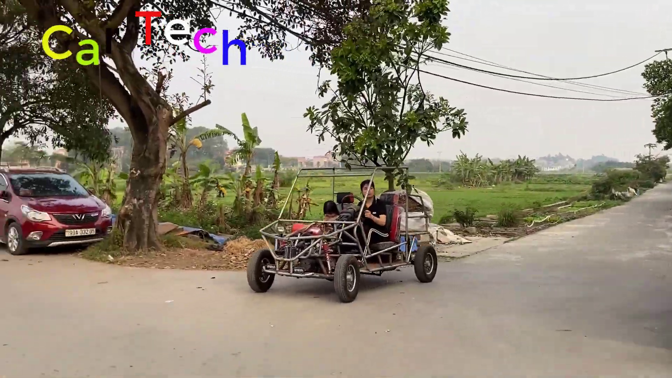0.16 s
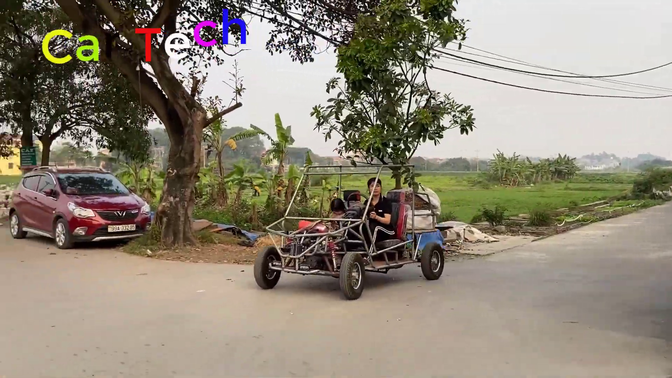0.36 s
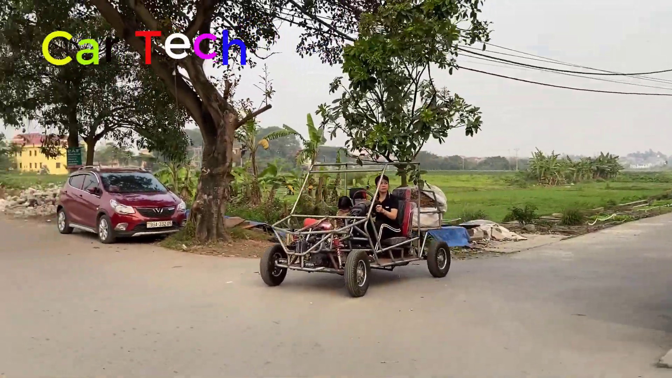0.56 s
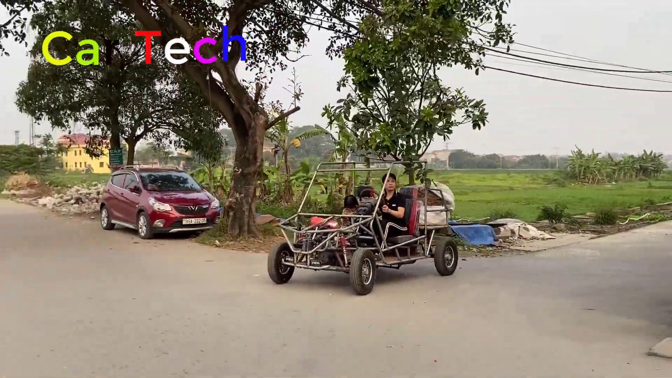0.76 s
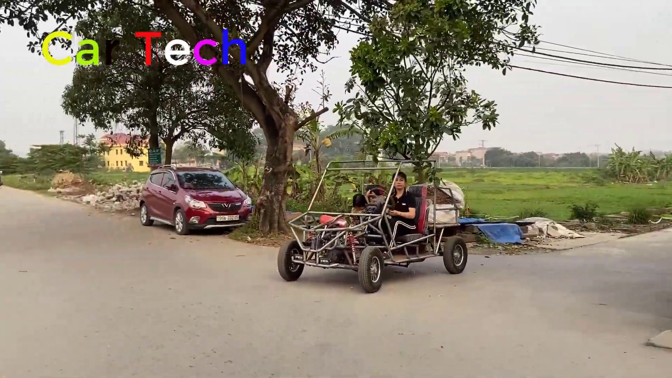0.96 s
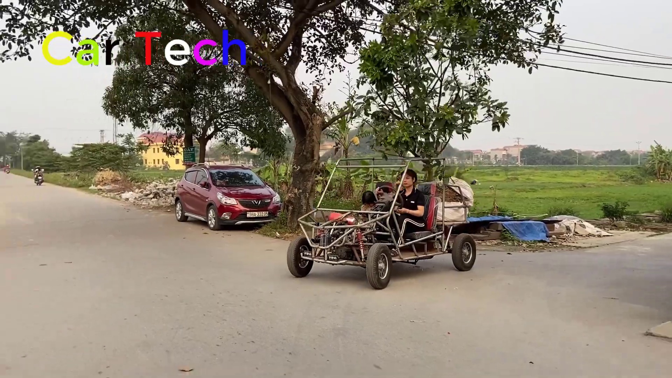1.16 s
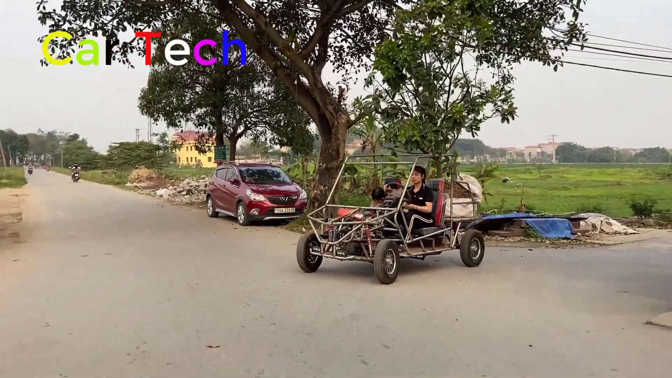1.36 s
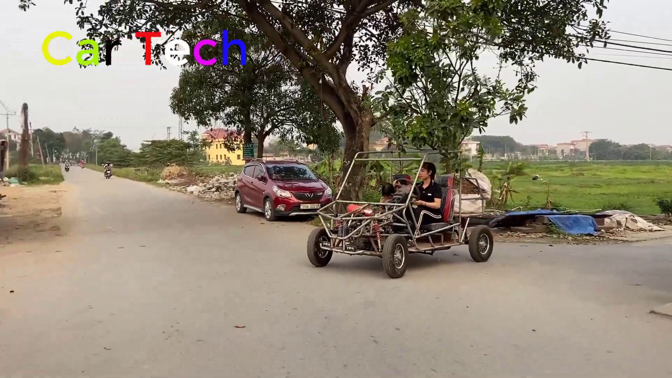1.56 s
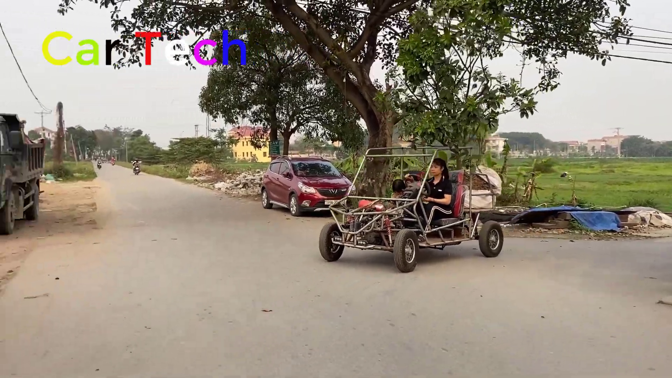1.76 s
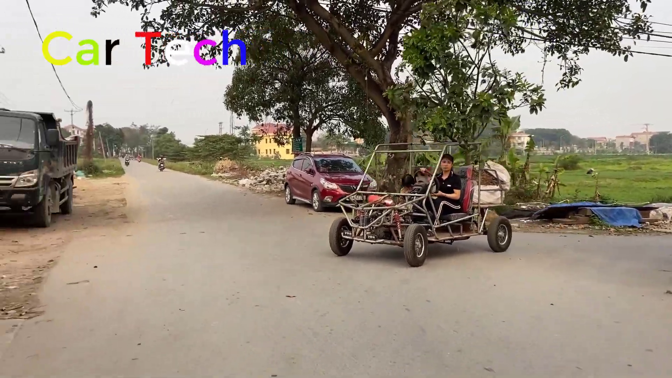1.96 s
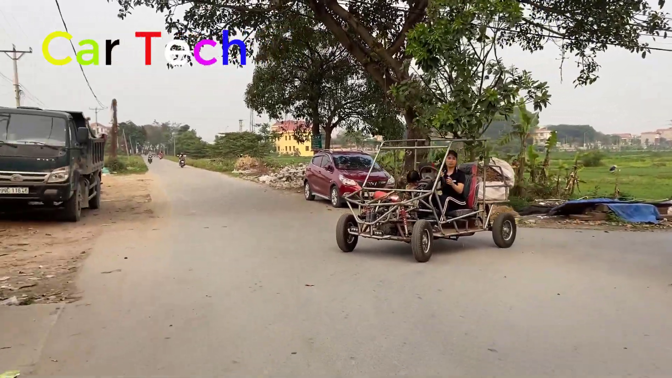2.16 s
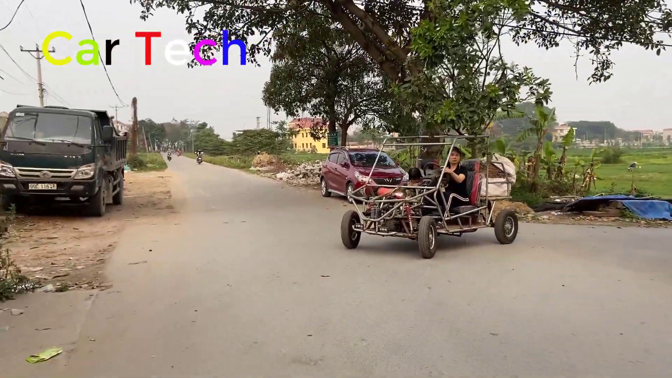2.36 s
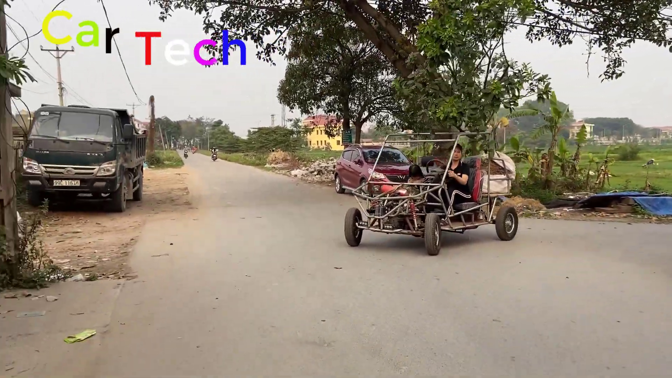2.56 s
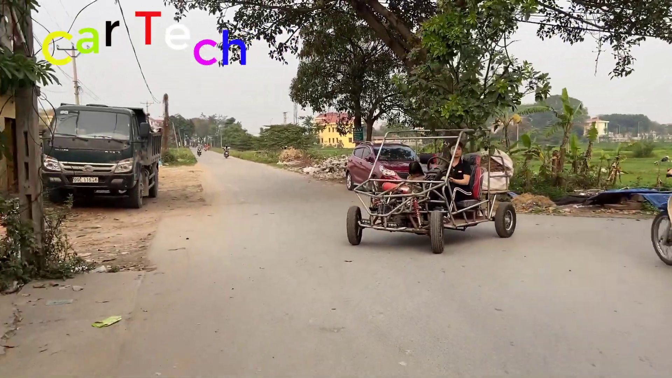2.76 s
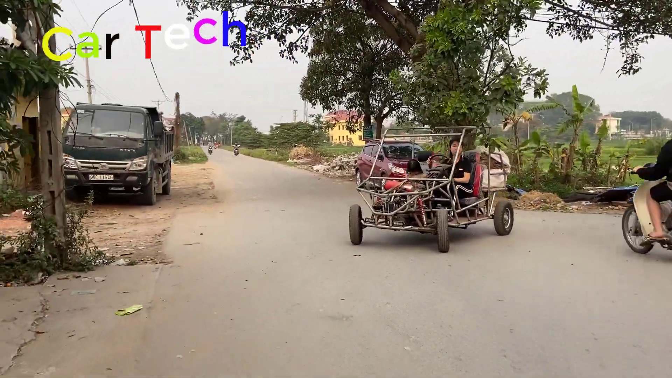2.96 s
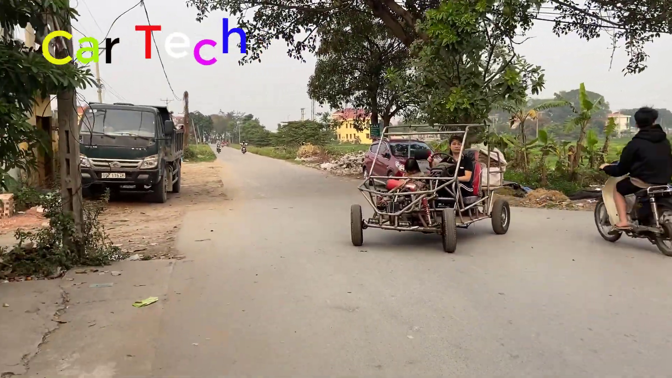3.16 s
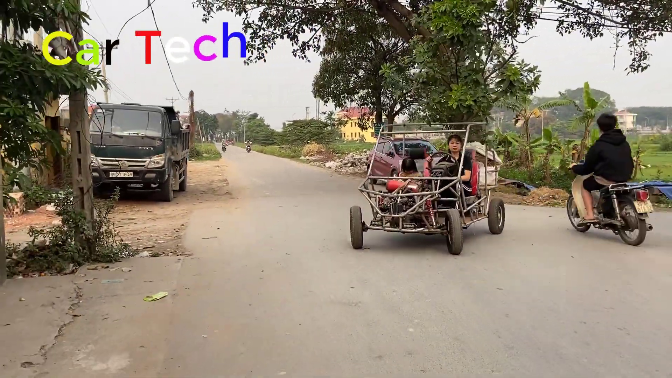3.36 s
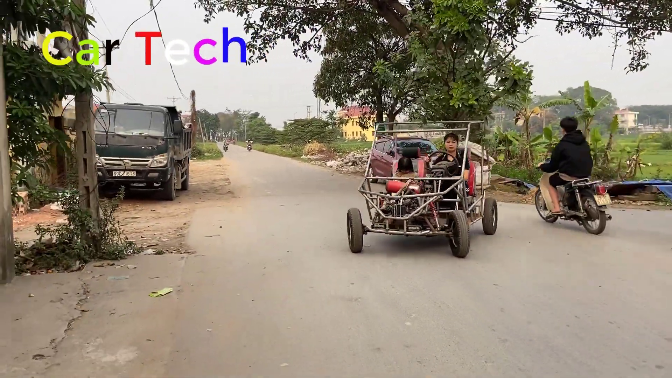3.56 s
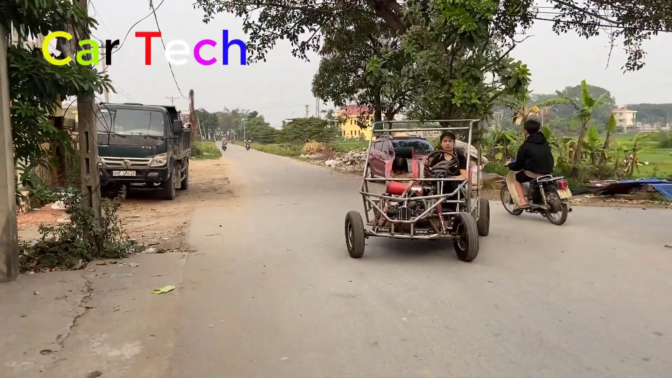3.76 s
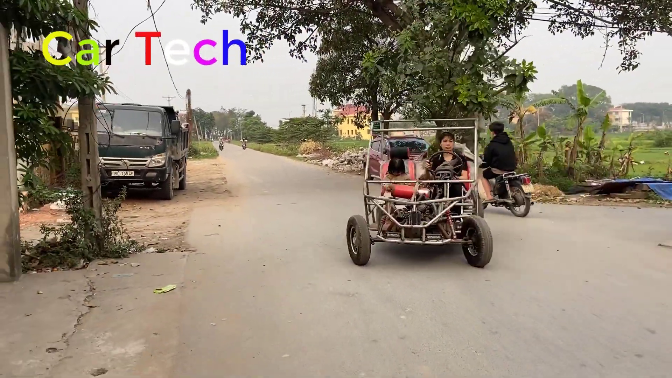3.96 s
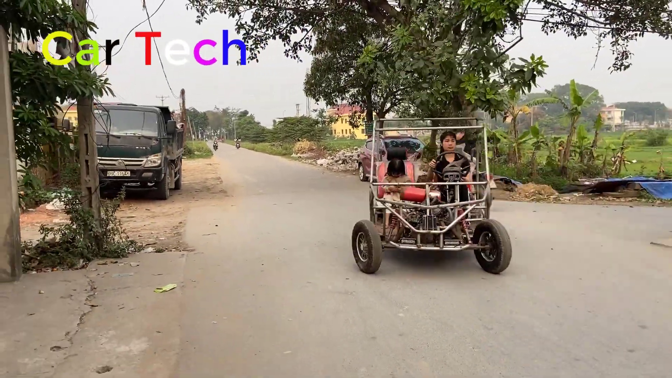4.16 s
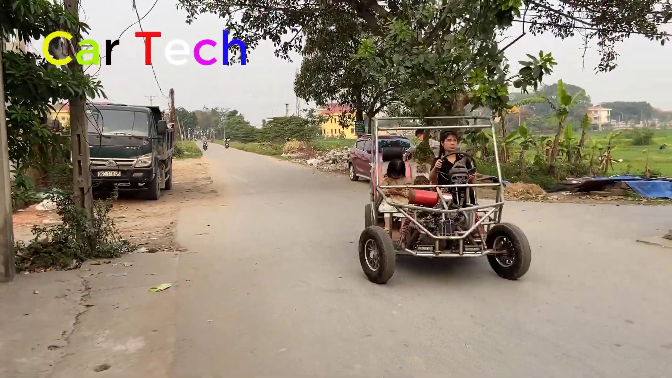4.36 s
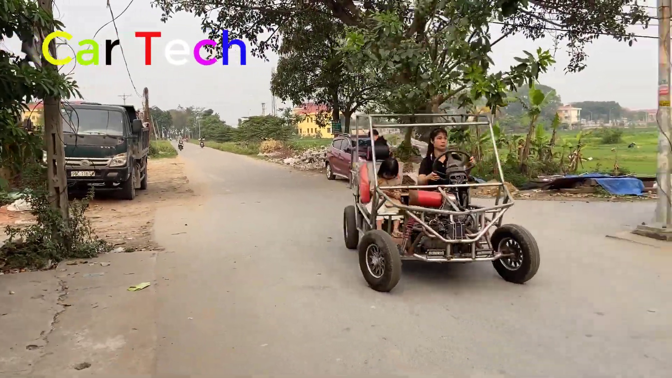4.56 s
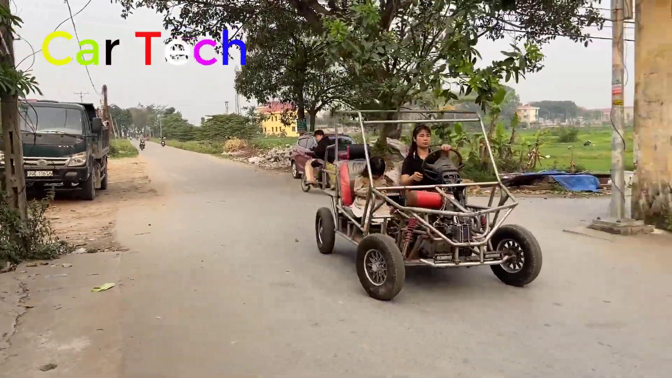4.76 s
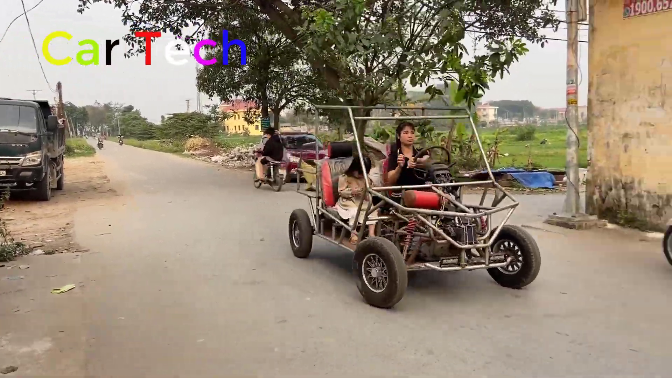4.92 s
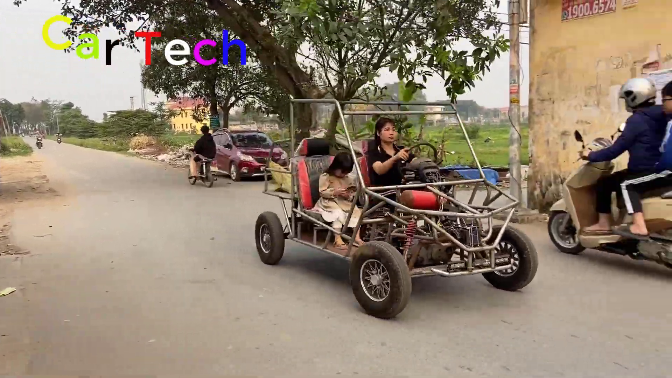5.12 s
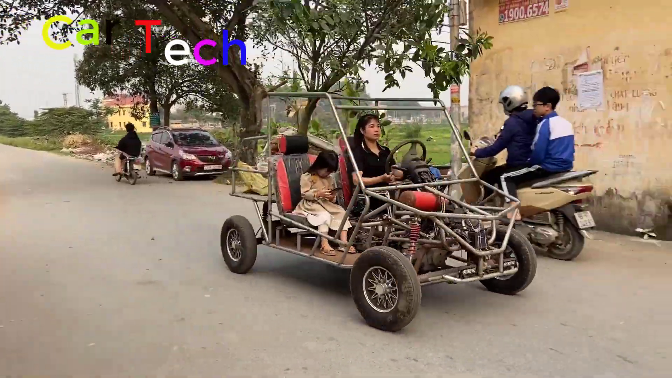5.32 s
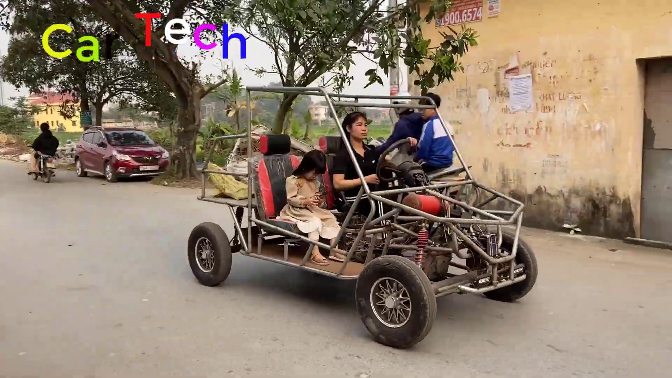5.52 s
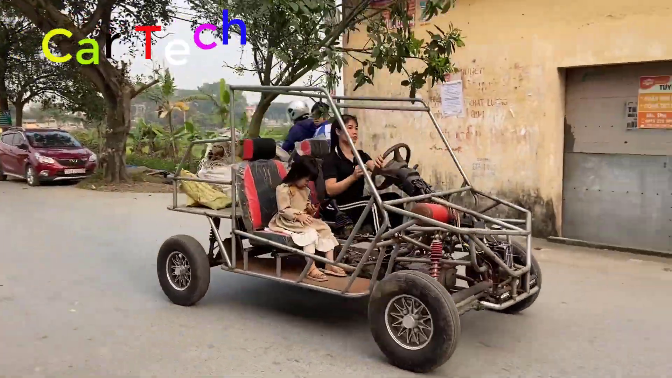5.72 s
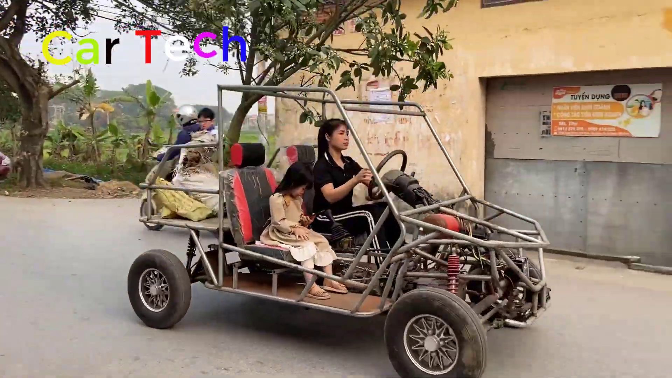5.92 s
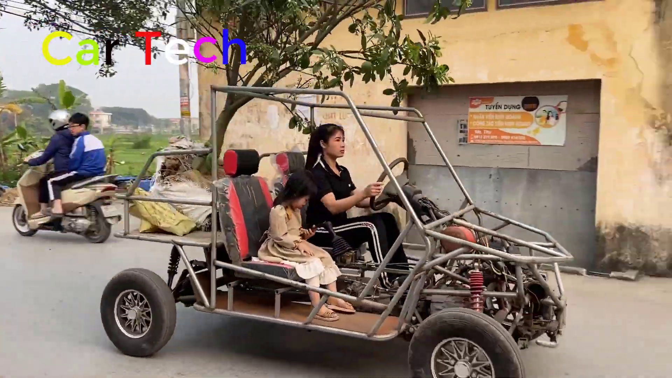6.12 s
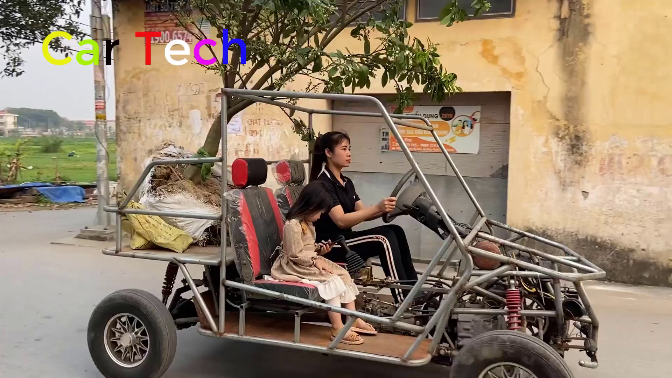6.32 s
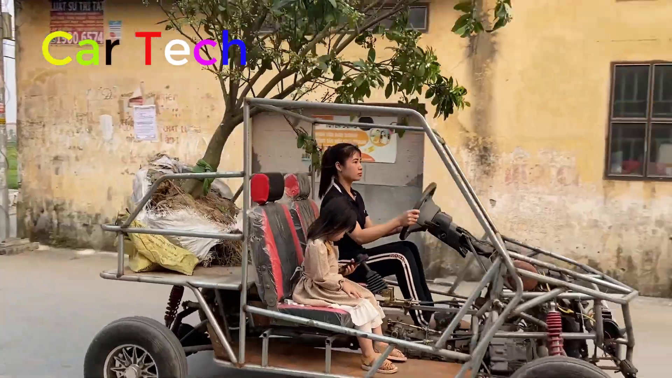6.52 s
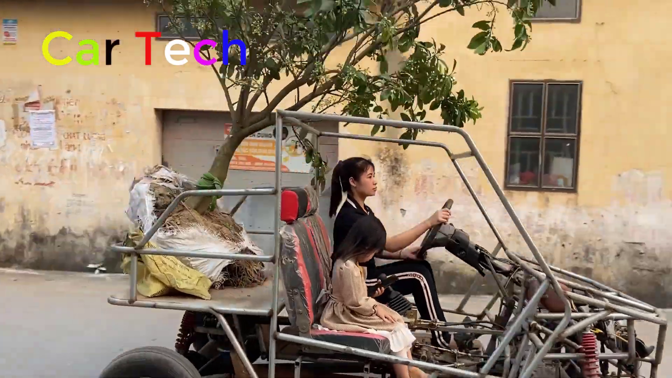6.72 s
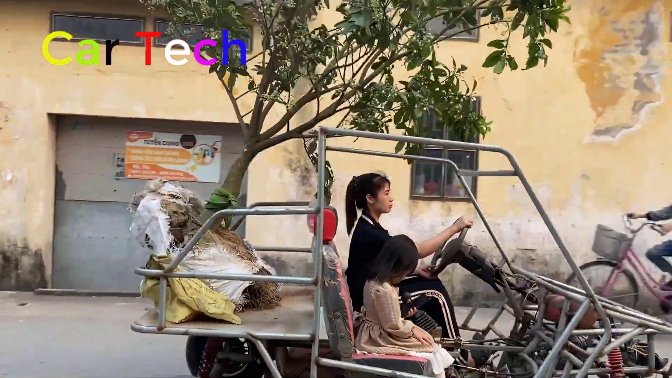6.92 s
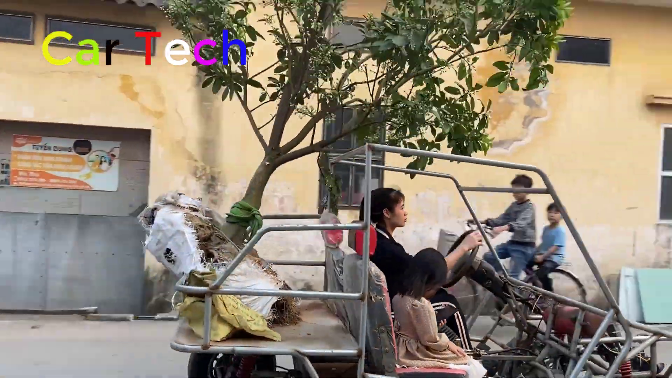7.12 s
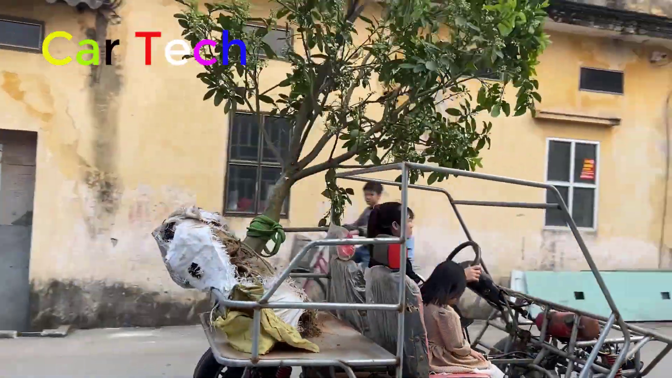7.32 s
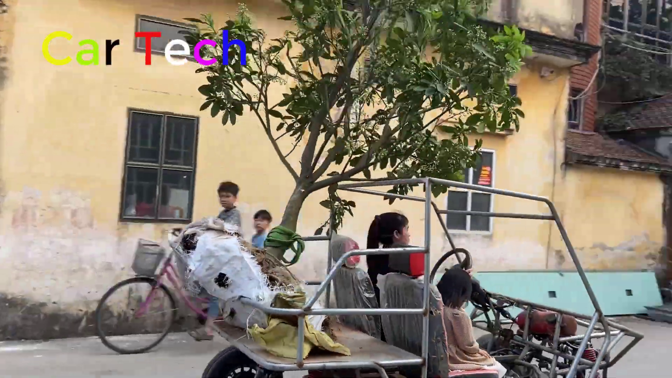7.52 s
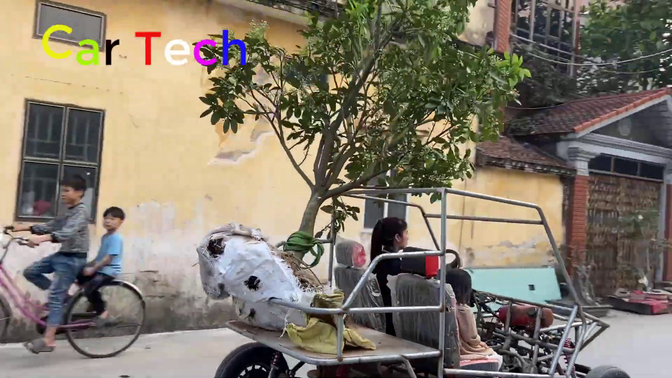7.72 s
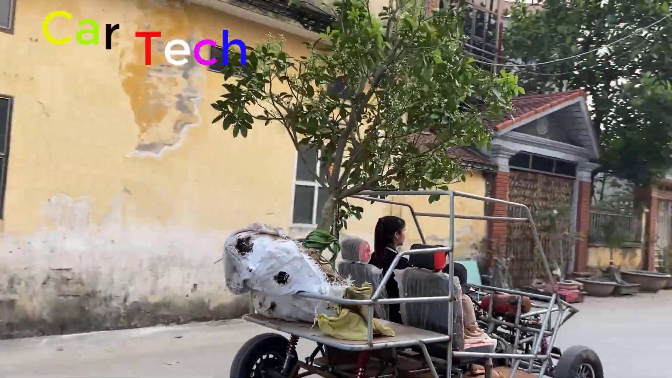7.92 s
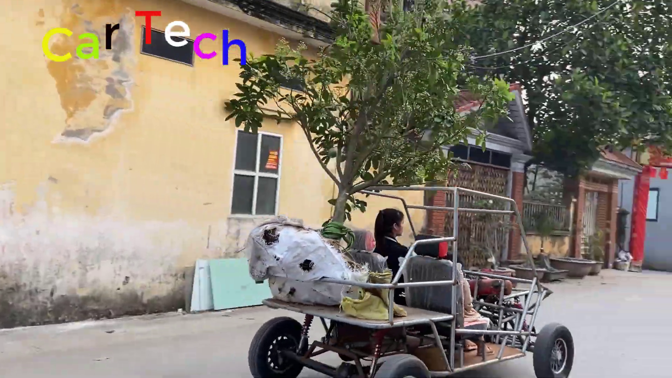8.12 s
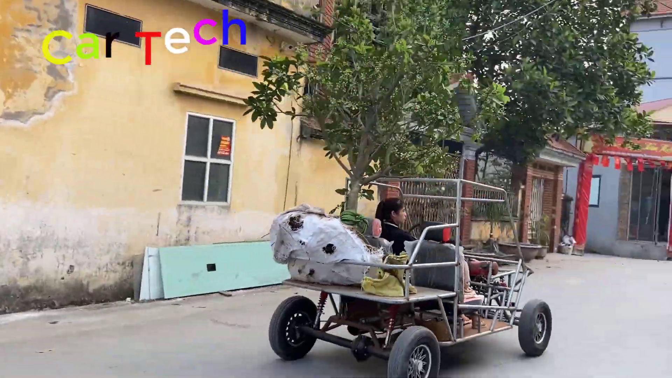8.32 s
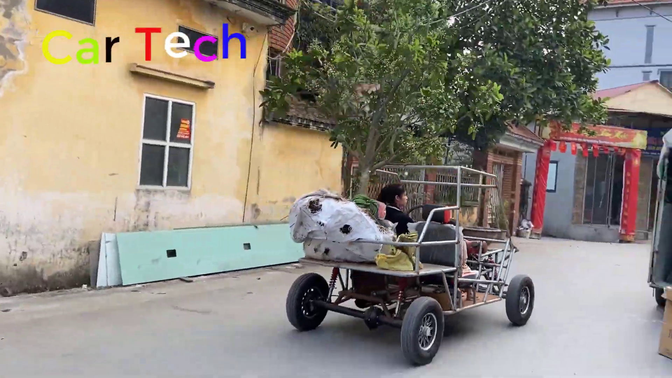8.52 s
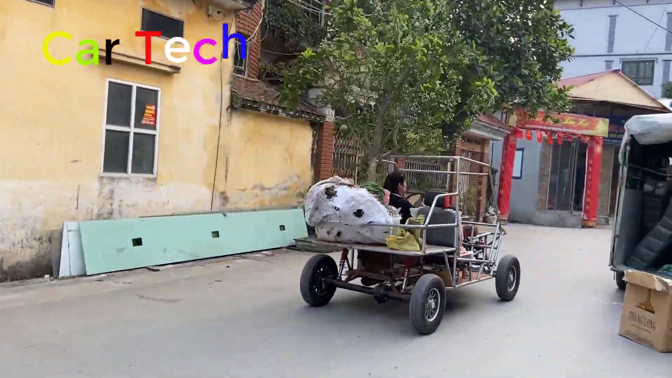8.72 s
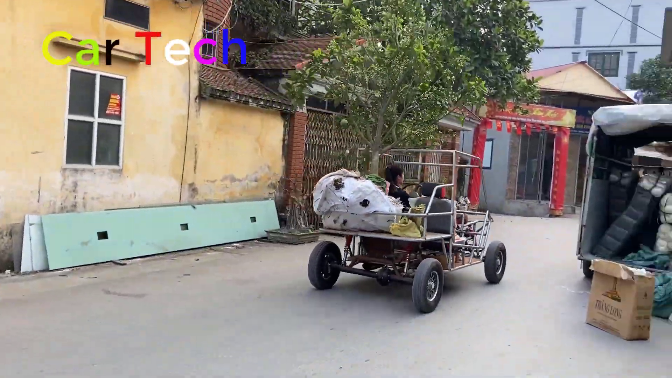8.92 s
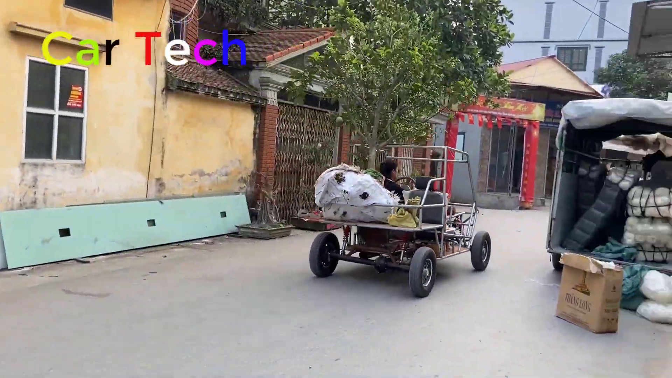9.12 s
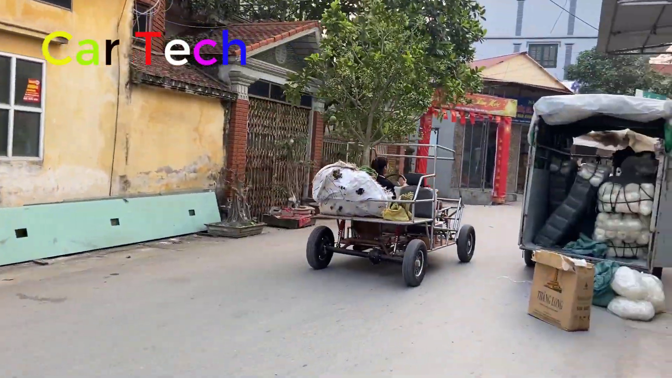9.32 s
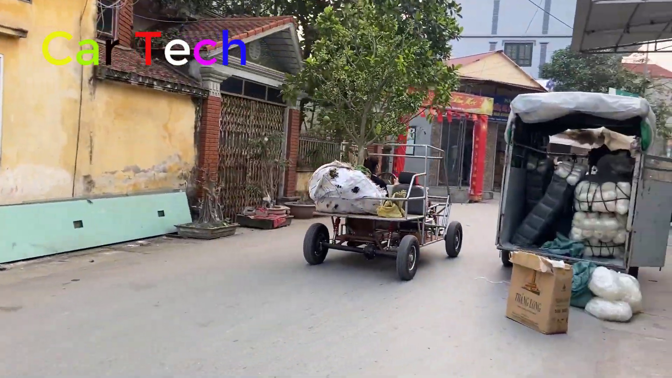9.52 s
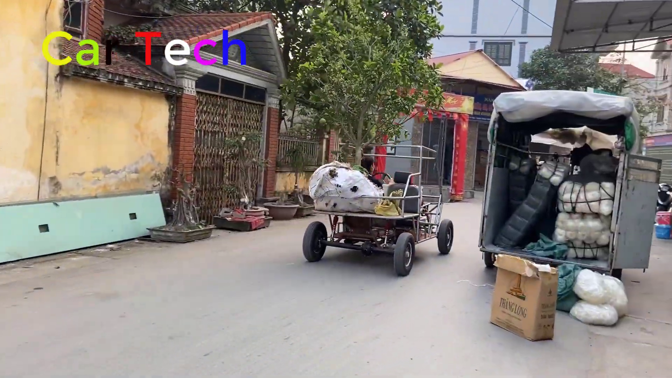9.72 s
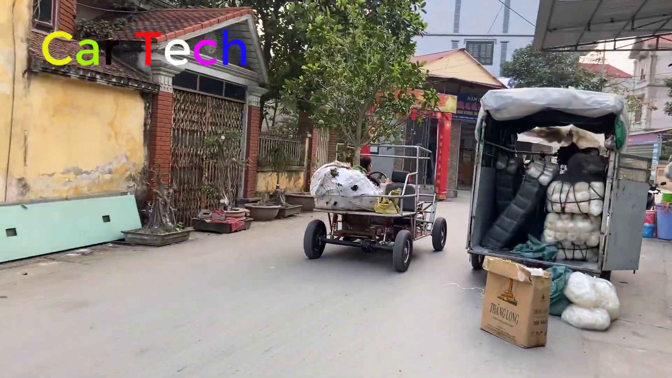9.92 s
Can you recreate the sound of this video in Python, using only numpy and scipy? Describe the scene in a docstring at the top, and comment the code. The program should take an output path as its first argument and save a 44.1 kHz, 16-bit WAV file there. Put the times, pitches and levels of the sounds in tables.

```python
"""A single-cylinder buggy revs, coasts, pulls past between walls and coasts away at idle; two scooters tick by.
Each firing leaves the silencer as a falling chirp: a crack, a thump and a ring, with boom and frame hum below.
Sliding delays throw the blasts back from ground and walls, and decaying sparse taps make the lane's tail.
Shaped noise makes rumble, hiss, wind and rattles; the scooters are bursts ringing resonances,
and faint whines are narrow noise."""
import sys
import numpy as np
from scipy import signal
from scipy.fft import rfft, irfft, next_fast_len
from scipy.io import wavfile
from scipy.ndimage import uniform_filter1d

SR = 44100
rng = np.random.default_rng(int(sys.argv[2]) if len(sys.argv) > 2 else 0)


def inscribe(sig):
    """Save sig as 16-bit PCM at rate SR to the path in sys.argv[1].

    A 1-D sig is mono; a 2-D sig holds one channel per row.
    Samples are clipped to [-1, 1] before scaling.
    """
    pcm = np.round(np.clip(np.atleast_2d(sig).T, -1, 1) * 32767)
    wavfile.write(sys.argv[1], SR, pcm.astype(np.int16))


N = 440118
TIME = np.arange(N) / SR
LEAD = 200  # samples a pulse may start ahead of its firing
PULSE_MS = (np.arange(2000) - LEAD) / SR * 1000  # time from the firing
HALVES = np.array([[.5], [-.5]])  # splits a left-right difference over the channels

# throttle pedal: t/s, opening (0 shut - 1 open)
THROTTLE = [(0, 0.96), (.47, 0.76), (.52, 0.059), (1.39, 0.31), (1.43, 0.59), (1.6, 0.82), (1.75, 0.97),
            (7.86, 0.72), (7.94, 0.16), (10, 0)]
# shut throttle, round putts and pumping between firings:
# t/s, putt level/dB against the thump, boom level/dB above its open level, pumping level/dB against firing's boom
COASTING = [(0, -14, 4, -10), (.7, -3, 14.5, 2.5), (.9, 4, 20, -2.5), (1.4, 2, 8, -5), (7.9, 0, 2.5, -11),
            (8.3, 2.5, 2, -13), (9, -3, 8, -5), (10, -2.5, 7, 6)]


def gain_of(db):
    """dB to gain."""
    return 10 ** (np.asarray(db) / 20)


def evened(x):
    """Scales to rms 1."""
    return x / np.sqrt(np.mean(x ** 2) + 1e-20)


def read(points, hz):
    """Reads a spectrum on a log-frequency axis."""
    f, value = np.transpose(points)
    return np.interp(np.log(hz + 1), np.log(f + 1), value)


def follow(rows):
    """Every column of a curve table, sample by sample."""
    s, *columns = np.transpose(rows)
    return [np.interp(TIME, s, c) for c in columns]


def delayed(x, seconds):
    """Delays a sound by a time that may follow a curve."""
    return np.interp(TIME - seconds, TIME, x)


def filtered(x, order, hz, kind="low"):
    """Butterworth filter."""
    return signal.sosfilt(signal.butter(order, hz, kind, fs=SR, output="sos"), x)


def resonate(x, hz, width):
    """A resonance of gain 1 that may follow a frequency curve."""
    turn = np.exp(2j * np.pi * np.cumsum(hz * np.ones(len(x))) / SR)
    r = np.exp(-np.pi * width / SR)
    return 2 * (turn * signal.lfilter([1 - r], [1, -r], x / turn)).real


def resonate_twice(x, hz, width, second_width):
    """Two resonances in series at one pitch, for steeper skirts."""
    return resonate(resonate(x, hz, width), hz, second_width)


def firings(rate, first_s, span):
    """Sample indices of the firings within the span, and the rate there."""
    turns = np.cumsum(rate) / SR
    at = np.flatnonzero(np.diff(np.floor(turns - turns[int(first_s * SR)]))) + 1
    at = at[(at > span[0] * SR) & (at < span[1] * SR)]
    return at, rate[at]


def hiss(spectrum, level_db, patchy_db, size):
    """Two-channel shaped noise with drifting patches in time and frequency."""
    # left-right likeness of noise: f/Hz, likeness (0-1)
    likeness = [(60, .97), (250, .9), (600, .55), (2000, .45), (4500, .42), (7000, .68), (9000, .86),
                (15000, .84)]
    hop, hz = size // 4, np.fft.rfftfreq(size, 1 / SR)
    a, b, c, d, patches = rng.standard_normal((N // hop + 5, len(hz), 5)).T
    patches = uniform_filter1d(patches, 8, axis=0)
    patches = evened(uniform_filter1d(patches, 10, axis=1))
    same = np.clip(read(likeness, hz), 0, 1)[:, None]
    left = a + 1j * b
    right = same * left + np.sqrt(1 - same ** 2) * (c + 1j * d)
    z = np.array([left, right]) * gain_of(read(spectrum, hz)[:, None] + patchy_db * patches)
    noise = signal.istft(z, nperseg=size, noverlap=size - hop)[1][:, :N]
    return gain_of(level_db) * evened(noise)


def crank():
    """Firing rate: the crank closes in exponentially on each new aim."""
    # speeds the crank settles to after a change of throttle or load: t/s, rate/firings per s, lag/s
    aims = [(0, 28.552, .127), (.459, 11.92, .3), (1.426, 16.485, .028), (1.604, 33.106, .15),
            (2.039, 33.389, .192), (3.833, 33.198, .309), (4.625, 32.425, .078), (5.03, 31.035, .072),
            (5.298, 31.585, .213), (6.336, 29.053, .062), (6.72, 29.427, .141), (7, 27.496, .05),
            (7.328, 29.116, .475), (7.878, 14.116, .211), (8.428, 15.482, .17), (8.604, 12.263, .863)]
    rate = np.full(N, 27.704)  # firings per s at the start
    for s, aim, lag in aims:
        at = int(s * SR)
        rate[at:] = aim + (rate[at] - aim) * np.exp(-(TIME[at:] - s) / lag)
    return rate


def controls(rate):
    """Throttle, crank speed and the way the pipe points set the level and colour of each part."""
    # pipe under open throttle: t/s, thump level/dB, mouth facing the listener (0-1)
    pipe = [(0, -24.5, 0.75), (.46, -25.5, 1), (1.6, -22, 0.75), (2, -21, 0.95), (2.4, -23.5, 0.95),
            (3.3, -25, 0.86), (3.8, -26, 0.74), (4.3, -27, 0.93), (5.2, -25.5, 1), (5.55, -25.5, 0.7),
            (5.8, -27, 0.6), (6.1, -26.5, 0.45), (6.33, -27, 0.9), (6.42, -25.5, 0.16), (6.7, -23.5, 0.13),
            (6.95, -25, 0.2), (7.1, -27.5, 0.35), (7.5, -26.5, 0.83), (7.85, -26.5, 0.6), (8.5, -26, 0.2),
            (10, -29, .4)]
    # silencer ring with the throttle well open: t/s, f/Hz, level/dB
    drone_curve = [(0, 254, -22), (.15, 256.5, -21.5), (.5, 257, -21), (1.4, 235, -30), (1.7, 225, -31),
                   (2.1, 229, -32), (2.5, 233, -32), (3.1, 233.5, -27), (3.7, 233.5, -36), (4.2, 233, -33),
                   (4.6, 232.5, -24.5), (5, 227, -30), (5.2, 219, -30), (5.45, 250, -25), (5.7, 252, -21.5),
                   (6.3, 252.5, -23), (6.5, 234, -25), (6.7, 262, -25), (6.98, 264, -22.5),
                   (7.12, 248, -21), (7.35, 248, -21), (7.86, 256.5, -20.5), (8.2, 232, -23),
                   (10, 228, -31)]
    # open throttle: t/s, ring louder on the left/dB, boom f/Hz, boom level/dB, frame hum level/dB (against thump)
    pitches = [(0, 2, 88, -18, -37), (.5, -2, 98.5, -14.5, -31), (1.7, 5, 62, -14.5, -12.5),
               (2.1, 5, 65, -16, -29), (3.2, -7, 67.4, -18, -21), (4.1, 6, 66, -15, -12),
               (4.6, -3, 65, -10, -15.5), (5.2, 0, 62, -10, -26), (5.5, 3, 60, -9, -28),
               (6.2, 1, 62.4, -13.5, -29), (6.45, -2, 58.6, -14.5, -31), (6.8, -4.5, 58.5, -18.5, -38),
               (7.1, -3.5, 55.3, -17, -37), (7.5, -7.5, 56, -20, -31), (7.85, -5, 57.6, -14.5, -28),
               (8.2, 3, 60, -14, -39), (10, 0, 61, -15, -37)]
    # crack colour under open throttle: t/s, bark f/Hz, bark level/dB, tip f/Hz, tip level/dB (against the crack),
    # rasp level/dB (against the thump)
    mouth_curve = [(0, 736, 3.5, 1160, 2.5, -13.5), (.5, 720, 12.5, 1200, 3, -16),
                   (1.7, 700, 5, 1090, 1.5, -15), (2, 720, 2, 1005, 2.5, -18),
                   (2.45, 700, 7.5, 1054, 3, -14.5), (3.05, 694, 4.5, 1090, -0.5, -15),
                   (3.5, 690, 11, 1070, 2, -19), (3.9, 670, 14.5, 1090, 4, -13),
                   (4.3, 664, 7, 990, 3, -12.5), (4.7, 620, 12, 1050, 5, -18),
                   (5.2, 696, 11.5, 900, -12, -19), (5.6, 710, 9.5, 950, -25, -28),
                   (5.95, 660, 18, 1070, 1, -11), (6.35, 674, 17.5, 1090, 11, -42),
                   (6.5, 600, 6, 1260, -1, -18), (6.85, 660, 17, 820.5, -33, -27),
                   (7.2, 630, 7, 786, -37, -22), (7.8, 745, 17, 830, -4, -16), (10, 650, -5, 900, -4, -30)]
    shut_mouth = -29, 478, -8.5, 758, -6.5, -29.5  # crack dB, then bark, tip and rasp as above
    throttle = np.clip(follow(THROTTLE)[0], 0, 1)
    over = rate - 10.83  # firings per s above idle

    def blend(shut, wide, power=1):
        return shut + (wide - shut) * throttle ** power

    open_thump_db, facing = follow(pipe)
    ring_hz, open_ring_db = follow(drone_curve)
    ring_pan_db, open_boom_hz, boom_db, hum_db = follow(pitches)
    away_db, facing_db = -14.5, -6.5  # crack with the mouth turned away, turned near
    opened = away_db + (facing_db - away_db) * facing, *follow(mouth_curve)
    # power 1.6: the crack comes only near full throttle
    crack_db, *mouth, rasp_db = (blend(s, o, 1.6) for s, o in zip(shut_mouth, opened))
    ringing = np.minimum(throttle / .7, 1)
    ring_db = (1 - ringing) * (1.5 - 0.94 * over) + ringing * (open_ring_db - open_thump_db)
    # a shut throttle weakens the thump, more as the crank slows
    thump_db = open_thump_db + blend(-19.5 + 1.17 * over, 0)
    boom_db = boom_db + blend(follow(COASTING)[1], 0)
    boom_hz = blend(81.3 + 0.65 * over, open_boom_hz)
    clear = np.clip(blend(0.63, facing), 0, 1)  # share of the thump that arrives unmuffled
    levels_db = thump_db, crack_db, rasp_db, ring_db, boom_db, hum_db
    return levels_db, mouth, boom_hz, ring_hz, ring_pan_db, clear


def firing_trains(speed, levels_db):
    """One impulse per firing for each part of the blast; a shut throttle burns unevenly."""
    # firings stronger or weaker, mostly while the throttle is nearly shut: t/s, level/dB
    uneven = [(.558, -3), (.599, -5), (.645, 5), (.755, 0), (.81, -1.5), (.868, 2), (.926, 1.5),
              (1.059, -5.5), (1.564, -33), (8.04, 4), (8.089, 1), (8.143, 0.5), (8.317, -3.5), (8.576, -7),
              (9.195, -2.5), (9.268, 5.5), (9.49, -10), (9.564, 3.5), (9.64, -2.5), (9.717, 4.5),
              (9.795, -26), (9.872, 4), (9.948, 11.5)]
    at, rate = firings(speed, .017, (0, N / SR))
    luck = rng.standard_normal((len(at), 3))
    idle = np.clip((26 - rate) / 8, 0, 1)
    odd_db = sum(db * (abs(at / SR - s) < .02) for s, db in uneven)
    thump_db, *parts_db = (c[at] for c in levels_db)
    strength_db = thump_db + odd_db + (0.08 + 1.6 * idle) * luck[:, 0]
    blast, front, gas, ring, boom, hum = np.zeros((6, N))
    blast[at] = gain_of(strength_db) * np.sqrt(SR / rate)
    boom_chance = (0.27 - 1) * odd_db  # only 0.27 of an uneven firing's dB reaches the boom
    chances = .8 * luck[:, 1], 3.6 * luck[:, 2], 0, boom_chance, 0
    for train, db, chance in zip((front, gas, ring, boom, hum), parts_db, chances):
        train[at] = blast[at] * gain_of(db + chance)
    return at, blast, front, gas, ring, boom, hum


def play(train, pulse):
    """Sounds a unit-energy pulse at every firing."""
    return signal.oaconvolve(train, pulse / np.linalg.norm(pulse))[LEAD:LEAD + N]


def swell(mid_ms, spread_ms):
    """Bell-shaped envelope in time from the firing."""
    return np.exp(-((PULSE_MS - mid_ms) / spread_ms) ** 2)


def falling(end_hz, extra_hz, fall_ms, turns):
    """A tone extra_hz sharp at the firing that falls exponentially to end_hz; turns offset its phase."""
    cycles = end_hz * PULSE_MS - extra_hz * fall_ms * np.exp(-PULSE_MS / fall_ms)
    return np.cos(2 * np.pi * (cycles / 1000 + turns))


def pipe_mouth(front, gas, crack, shut, colours):
    """The crack rings the pipe mouth as bark, tip and overtone; torn gas adds rasp and a sharp snap."""
    # pipe overtone against the crack: t/s, level/dB
    overtone_db = [(0, 3.5), (.5, 7.5), (1.4, 1), (2, -0.5), (2.8, 2), (3.5, 2.5), (4.3, 3), (5.1, -0.5),
                   (5.9, 3.5), (6.5, 6), (7, 1), (7.7, 1), (8.2, 6.5), (10, 1)]
    bark_hz, bark_db, tip_hz, tip_db = colours
    # with the throttle shut the weak front comes up to 5 ms later, arriving about with the thump
    edge = delayed(play(front, crack), 5 / 1000 * shut)
    bark = 1.12 * gain_of(bark_db) * resonate_twice(edge, bark_hz, 300, 600)
    tip = 1.71 * gain_of(tip_db) * resonate_twice(edge, tip_hz, 540, 540)
    overtone = 2.03 * gain_of(follow(overtone_db)[0]) * resonate_twice(edge, 376, 320, 640)
    puff = np.maximum(PULSE_MS + 1.5, 0) * np.exp(-PULSE_MS / 1.6)
    torn = play(gas, puff) * rng.standard_normal(N)
    rasp = 4.2 * resonate_twice(torn, 1570, 344, 344)
    snap = 1.8 * gain_of(-6.5) * resonate_twice(gas, 1910, 830, 830)
    return filtered(bark + overtone + tip + rasp + snap, 4, 2500)  # the pipe passes little above this


def thump_body(blast, thump, clear):
    """The silencer's low thump, blended with a duller one heard from behind the mouth."""
    body = filtered(play(blast, thump), 2, 640)
    muffled = np.cos(2 * np.pi * (193 * PULSE_MS / 1000 + 0.21)) * swell(5.7, 5.5)
    body = clear * body + (1 - clear) * play(blast, muffled)
    return filtered(body, 2, 108, "high")


def coasting_putts(blast, shut):
    """With the throttle shut each firing is a round putt that falls in pitch."""
    rise = np.clip(PULSE_MS / 4 + 1, 0, 1) ** 2
    putt = falling(73.3, 127, 10.83, 0.21) * swell(19, 24) * rise
    return play(blast * np.sqrt(shut) * gain_of(follow(COASTING)[0]), putt)


def boom_and_hum(at, boom, hum, boom_hz, shut):
    """Firings ring a low boom and a frame hum; at idle the turn between firings pumps the boom too."""
    between = (at[:-1] + at[1:]) // 2
    pumping = shut * gain_of(follow(COASTING)[2])
    boom[between] = boom[at[:-1]] * pumping[between]
    width = 23.4  # Hz, first of three stages
    low = resonate(resonate_twice(boom, boom_hz, width, 96.0), boom_hz, 122.0) * np.sqrt(SR / width)
    low = filtered(low, 2, 48, "high")
    hum_hz, hum_width = 97.6, 14.6  # Hz
    return low + resonate_twice(hum, hum_hz, hum_width, 2 * hum_width) * np.sqrt(SR / hum_width)


def exhaust():
    """The silencer delays the low part of each blast: a crack first, then a falling thump and its ring."""
    speed = crank()
    levels_db, colours, boom_hz, ring_hz, ring_pan_db, clear = controls(speed)
    at, blast, front, gas, ring, boom, hum = firing_trains(speed, levels_db)
    shut = np.clip(1 - 2 * follow(THROTTLE)[0], 0, 1)
    chirp = falling(207.3, 710, 1.54, 1.263) * np.clip(PULSE_MS / 2 + 1, 0, 1) ** 2
    crack = chirp * swell(0.503, 2.38)
    thump = chirp * swell(5.8, 2.14)
    blasts = thump_body(blast, thump, clear) + coasting_putts(blast, shut)
    blasts = blasts + pipe_mouth(front, gas, crack, shut, colours)
    low = boom_and_hum(at, boom, hum, boom_hz, shut)
    # the resonance keeps one overtone of the thump; 2.7 brings it to full level
    drone = 2.7 * resonate(filtered(play(ring, thump), 2, 640), ring_hz, 13)
    return blasts, low, drone, ring_pan_db


def walls(x):
    """Echoes whose delay slides as the buggy moves; ground and near surface return little bass."""
    # ground, near surface, wall, far wall: later on the left/ms, louder on the left/dB
    sides = (0.34, -8), (0.28, 9.5), (-0.39, -4), (0.35, 5.5)
    # sliding delays on the right: t/s, near surface/ms, wall/ms
    delay_curve = [(0, 7.9, 24), (1.8, 5.5, 12), (2.2, 5.75, 11), (2.6, 4.77, 10.16), (3, 4.47, 8.5),
                   (3.5, 4, 9.66), (4, 3.87, 10.8), (4.5, 3.45, 12.4), (5.2, 3.4, 12.4), (5.6, 3.9, 14.9),
                   (6, 4.06, 16), (6.5, 5.1, 16.1), (7, 4.43, 17.7), (7.8, 5.7, 15.5), (10, 4.2, 12)]
    # echo strengths: t/s, ground level/dB, near surface level/dB, wall level/dB, far wall level/dB
    echo_levels = [(0, -10, -23, -28, -22), (1.9, -2.5, -11, -43, -29), (2.4, -17, -4, -30, -47),
                   (2.9, -12, -1.5, -7, -5.5), (3.6, -40, -3.5, -3, -34), (4.2, -24, -5, 0, -3),
                   (4.5, -8, -5, -2, -4), (5.2, 0.5, -7, -22.5, -11), (5.8, -27, -2.5, 0, -10),
                   (6.4, -25, -6.5, -5.5, -24), (7.001, -24, -4, -6.5, -11), (7.8, -5, -9.5, -4.5, -11.5),
                   (10, 3.5, -26, -30, -0.5)]
    out = np.zeros((2, N))
    thin = filtered(x, 1, 300, "high")
    near_ms, wall_ms = follow(delay_curve)
    delays = 4.266, near_ms, wall_ms, wall_ms + 7.445  # the far wall answers later still
    for sound, ms, db, (left_ms, pan_db) in zip((thin, thin, x, x), delays, follow(echo_levels), sides):
        late = ms + np.array([[left_ms], [0]])
        out += delayed(sound, late / 1000) * gain_of(db + pan_db * HALVES)
    return out


def lane(x):
    """Diffuse tail: sparse taps of random sign, each band dying at its own speed."""
    # tail decay: f/Hz, t60/s
    decay = [(100, 1), (300, 0.43), (1000, 0.52), (6000, 0.21)]
    taps = np.zeros((2, SR // 2))
    at = np.arange(900, SR // 2 - 20, 20) + rng.integers(0, 20, (2, (SR // 2 - 901) // 20))
    np.put_along_axis(taps, at, rng.choice([-1., 1.], at.shape), 1)
    taps[1] = 1.02 * taps[0] + 0.66 * taps[1]  # the right partly shares the left's taps
    hz, t, z = signal.stft(taps, SR, nperseg=512)
    tail = signal.istft(z * gain_of(-60 * t / read(decay, hz)[:, None]), SR, nperseg=512)[1]
    return signal.fftconvolve(x[None], tail / np.linalg.norm(tail[0]), axes=1)[:, :N]


def running():
    """Rumble and hiss fade with distance and sink on a shut throttle; loose parts make the hiss flicker."""
    # running noise before the coasting drop: t/s, tyre and gear rumble level/dB, hiss level/dB
    running_levels = [(0, -35, -51), (.5, -33, -51), (1.8, -33, -43.5), (3.2, -32, -43), (4, -32.5, -47.5),
                      (5.5, -31.5, -43.5), (6.3, -29.5, -42.5), (6.6, -30.5, -46.5), (7.25, -34, -50.5),
                      (7.9, -38.5, -49.5), (8.7, -39, -53), (10, -40, -50)]
    # rumble spectrum: f/Hz, relative density/dB per Hz
    rumble_spectrum = [(30, -25), (60, 3), (120, 2.5), (250, 7), (500, 0.5), (1000, -10.5), (1600, -14.5),
                       (2200, -22.5), (4500, -24), (7000, -44.5)]
    # hiss spectrum: f/Hz, relative density/dB per Hz
    hiss_spectrum = [(1500, 5), (3000, 4.5), (5400, -1), (7500, 2), (8800, -3), (9600, -53)]
    # spectrum of the top of the hiss: f/Hz, relative density/dB per Hz
    fizz_spectrum = [(8800, -48), (9600, 2.5), (11000, 0.5), (13000, -2.5), (15500, 0)]
    # top of the hiss, lost first with distance: t/s, level/dB against the hiss
    fizz_levels = [(0, -1.5), (.8, -11), (1.5, -5.5), (3, -3), (4.6, -4), (5.5, -3.5), (7.6, -3),
                   (8.05, -7.5), (8.8, -10), (10, -6)]
    r = np.exp(-1 / (0.14 * SR))  # 0.14 s lag behind the throttle
    coasting = signal.lfilter([1 - r], [1, -r], 1 - follow(THROTTLE)[0])
    rumble_db, hiss_db = follow(running_levels)
    rumble_db = rumble_db - 9 * coasting
    hiss_db = hiss_db - 12 * coasting
    flicker = evened(uniform_filter1d(rng.standard_normal(N), 900))
    fizz_db = hiss_db + follow(fizz_levels)[0] + 2.2 * flicker
    rumble = hiss(rumble_spectrum, rumble_db, 2.86, size=1024)
    high = hiss(hiss_spectrum, hiss_db + 0.5 * flicker, 2.8, size=256)
    return rumble + high + hiss(fizz_spectrum, fizz_db, 2.8, size=256)


def wind():
    """Lumpy low buffeting at the microphone, made of slowly patchy noise."""
    # wind strength: t/s, level/dB
    wind_levels = [(0, -27.5), (.4, -28), (.7, -36), (1.3, -43), (1.8, -42), (2.3, -50), (6, -53),
                   (6.8, -43), (7.7, -50), (8.7, -42), (10, -73)]
    # buffeting spectrum: f/Hz, relative density/dB per Hz
    gust_spectrum = [(15, -27), (30, -6), (45, -11), (60, 2), (90, -39), (200, -61.5)]
    return hiss(gust_spectrum, follow(wind_levels)[0], 3.9, size=2048)


def rattles():
    """Thin metallic rattles: bright noise bursts with a quick swell and exponential decay."""
    # rattle bursts: t/s, relative peak level/dB, t60/s
    bursts = [(1.1368, -33, 0.16), (1.571, -32, 0.041), (5.474, -33, 0.099), (9.6574, -41.5, 0.2)]
    # rattle spectrum: f/Hz, relative density/dB per Hz
    rattle_spectrum = [(4000, -2.5), (7000, -5), (10000, 2), (12000, 1), (15500, 6.5)]
    shape = np.zeros(N)
    for s, db, t60 in bursts:
        fade_db = db - 60 * np.maximum(TIME - s, 0) / t60
        shape += gain_of(fade_db) * np.clip((TIME - s) / 0.0027 + 1, 0, 1)
    return hiss(rattle_spectrum, -4, 2.5, size=256) * shape


def scooter(speed, first_s, rows, high_db):
    """Each firing is a short burst that rings the valve gear and case, and a soft puff from the pipe."""
    # valve tick resonances: f/Hz, first-stage width/Hz, relative level/dB
    tick_modes = [(6440, 200, 1.5), (6500, 96, 1), (7070, 580, 2.2)]
    # case knock resonances: f/Hz, first-stage width/Hz, relative level/dB
    knock_modes = [(3480, 310, 8.1), (4520, 110, 2.5)]
    # high ring resonances: f/Hz, first-stage width/Hz, relative level/dB
    high_modes = [(7790, 410, 17), (9700, 3800, -0.5)]
    # exhaust puff resonances: f/Hz, first-stage width/Hz, relative level/dB
    puff_modes = [(122, 20, 18), (230, 27, -25)]
    at, rate = firings(follow(speed)[0], first_s, (speed[0][0], speed[-1][0]))
    tick_db, knock_db, puff_db = follow(rows)
    blow = np.zeros(N)
    blow[at] = gain_of(1.8 * rng.standard_normal(len(at))) * np.sqrt(SR / rate)
    fade = np.exp(-np.arange(1500) / (.0035 * SR))
    burst = signal.oaconvolve(blow, fade / np.linalg.norm(fade))[:N] * rng.standard_normal(N)
    parts = ((tick_db, tick_modes, burst), (knock_db, knock_modes, burst),
             (tick_db + high_db, high_modes, burst), (puff_db, puff_modes, blow))
    out = np.zeros(N)
    for db, modes, drive in parts:
        rung = sum(gain_of(g) * resonate_twice(drive, f, w, 3 * w) for f, w, g in modes)
        out += gain_of(db) * rung / np.sqrt(np.mean(rung[at[0]:at[-1]] ** 2))
    return out


def scooters():
    """Two scooters, one after the other, each with its own speed and balance of parts."""
    # one table a scooter: t/s, rate/firings per s
    speeds = [(2.05, 18.64), (2.5, 20.65), (2.9, 21.97), (3.1, 24.21), (3.3, 24.91), (3.6, 25.52),
              (4.4, 25.52)], [(8.6, 32.75), (9, 34.28), (9.3, 35.49), (9.6, 35.76), (10, 37.94)]
    # one table a scooter, before the mix: t/s, valve gear level/dB, case knock level/dB, exhaust level/dB
    balances = [
        [(2.05, -77, -50, -41), (2.35, -52, -48.5, -31), (2.75, -61, -52, -45), (2.92, -45.5, -51, -46),
         (3.2, -50.5, -52, -51), (3.4, -47.5, -78, -45), (3.85, -43, -70, -67), (4.2, -52, -55, -63),
         (4.4, -70, -66, -57)],
        [(8.6, -79, -71, -38), (8.8, -63.5, -65, -58), (9.03, -61, -78, -51), (9.6, -69, -91, -53),
         (10, -69, -87, -63)],
    ]
    first_firings = 2.096, 8.601  # s
    highs_db = 0.5, -4  # high ring against the valve tick
    return sum(scooter(*s) for s in zip(speeds, first_firings, balances, highs_db))


def whine(rows):
    """A fuzzy line: noise through a narrow gliding resonance, faded in over 84 ms."""
    hz, db = follow(rows)
    line = evened(resonate_twice(rng.standard_normal(N), hz, 75, 75))
    return line * gain_of(db) * np.clip((TIME - rows[0][0]) / 0.084, 0, 1)


def whines():
    """Faint whines, one low and one thin and high, as the engine quietens."""
    # low whine, before the mix: t/s, f/Hz, level/dB
    low_whine = [(7.9, 1380, -75), (8, 1380, -61), (8.25, 1385, -68), (8.4, 1440, -74), (8.9, 1465, -67),
                 (9.2, 1490, -65), (9.5, 1510, -64), (9.98, 1545, -62)]
    # thin high whine, before the mix: t/s, f/Hz, level/dB
    thin_whine = [(8.8, 7438, -76), (8.886, 7193, -83), (9.01, 7330, -67), (9.962, 7200, -74),
                  (9.97, 7233, -73)]
    return whine(low_whine) + whine(thin_whine)


def scene():
    """The buggy between its walls, the scooters and the lane."""
    blasts, low, ring, ring_pan_db = exhaust()
    others = scooters() + whines()
    bounce = gain_of(-4.5) * np.array([delayed(others, ms / 1000) for ms in (1.3, 2.9)])  # off the road
    buggy = blasts * gain_of([[-.5], [.5]]) + low * gain_of([[-.4], [.4]])
    buggy = buggy + ring * gain_of(ring_pan_db * HALVES) + walls(blasts)
    near = buggy + 0.71 * (others + bounce)
    dulled = filtered(blasts, 1, 955)
    tail = gain_of(-11.5) * lane(dulled + 0.79 * others)
    return near + tail + running() + rattles() + wind()


def record(dry):
    """Treble reaches the two ports out of step, the deepest bass is lost; then the band limit."""
    # phase between the ports: f/Hz, left leads by/radians
    port_phase = [(0, 0), (5000, 0), (7200, -.4), (9150, -3.14), (11200, -6.28), (13400, -9.42),
                  (16000, -12.7)]
    size = next_fast_len(N + 4096)
    lead = np.exp(.5j * read(port_phase, np.fft.rfftfreq(size, 1 / SR)))
    ported = irfft(rfft(dry, size) * [lead, 1 / lead], size)[:, :N]
    ported = filtered(ported, 2, 35, "high")
    band_limit = signal.firwin(511, 15830, window=("kaiser", 9), fs=SR)
    return signal.oaconvolve(ported, band_limit[None], "same")


dry = scene()
out = record(dry)
inscribe(out)
```